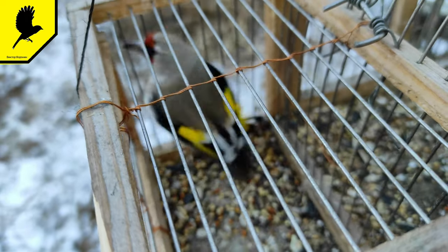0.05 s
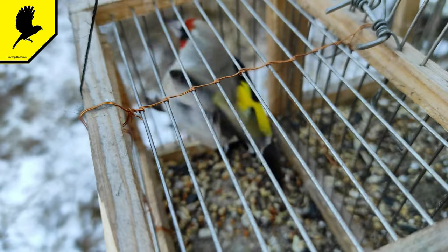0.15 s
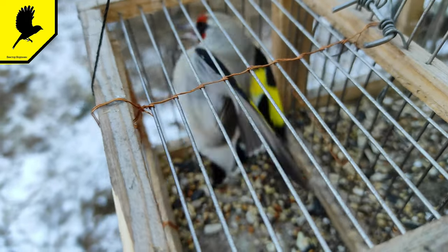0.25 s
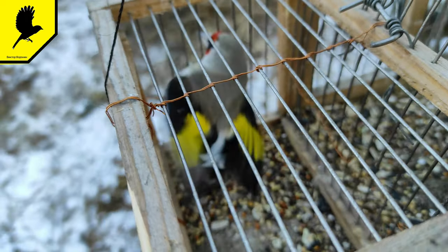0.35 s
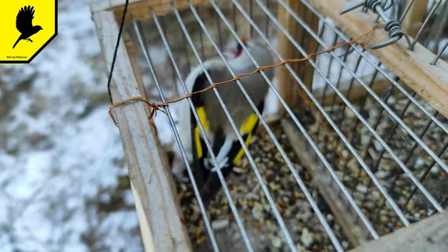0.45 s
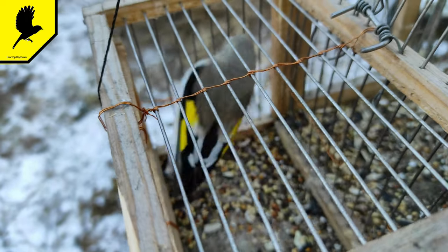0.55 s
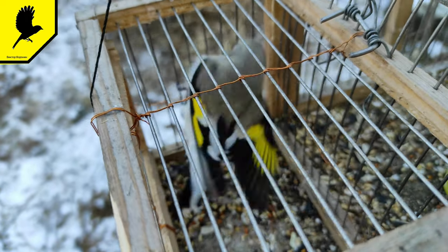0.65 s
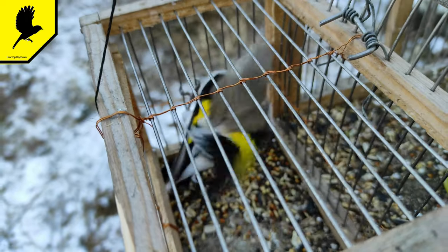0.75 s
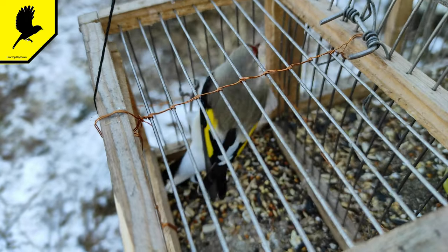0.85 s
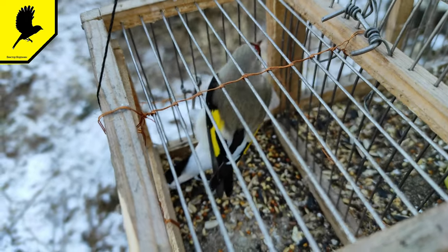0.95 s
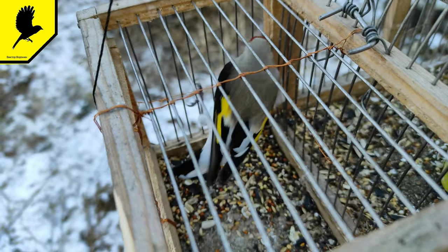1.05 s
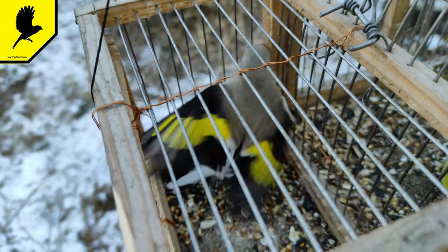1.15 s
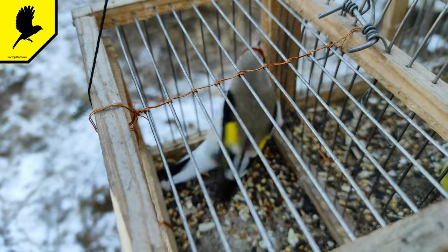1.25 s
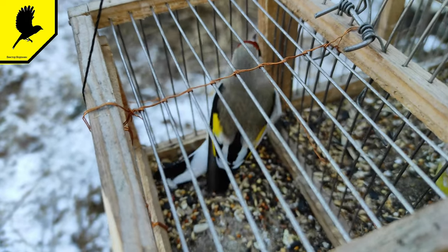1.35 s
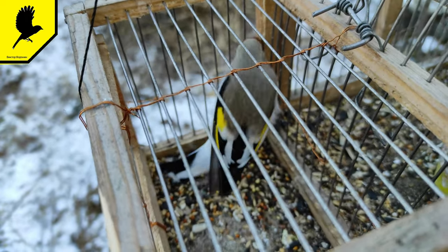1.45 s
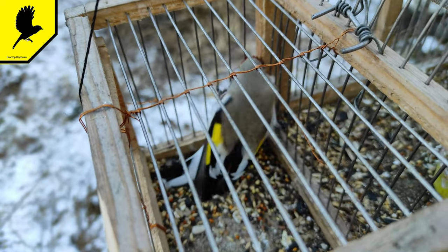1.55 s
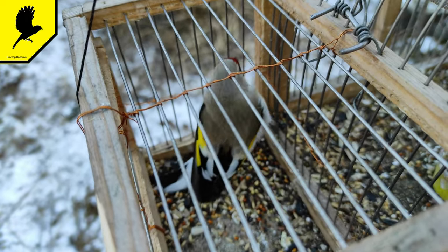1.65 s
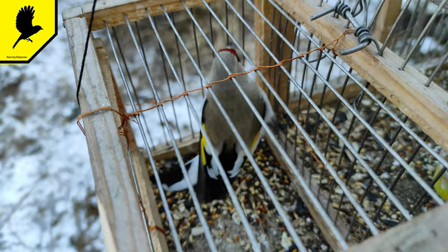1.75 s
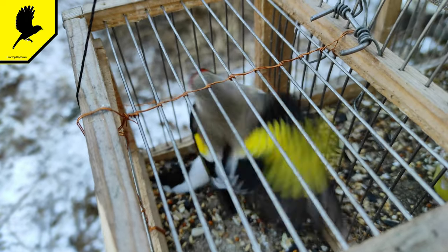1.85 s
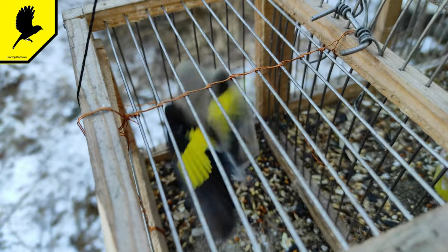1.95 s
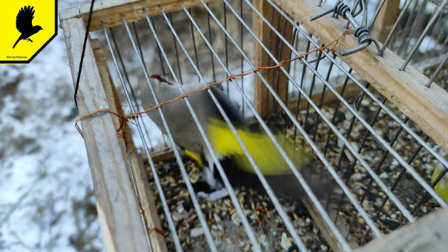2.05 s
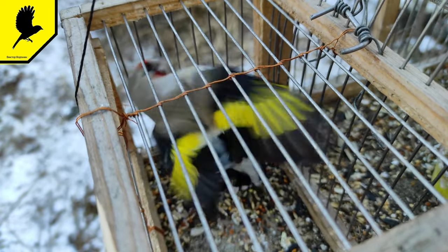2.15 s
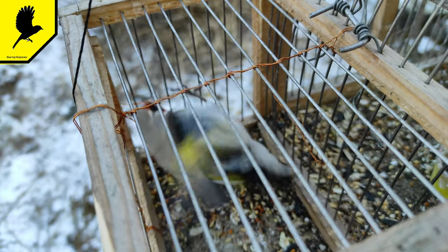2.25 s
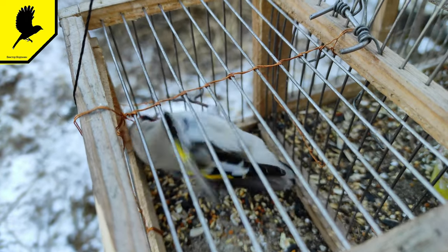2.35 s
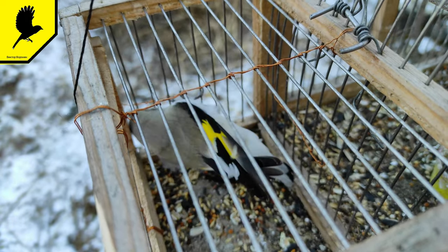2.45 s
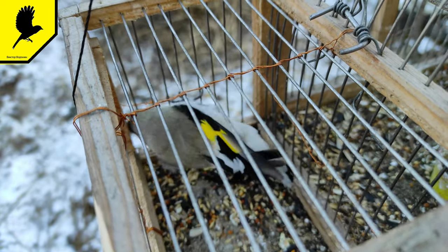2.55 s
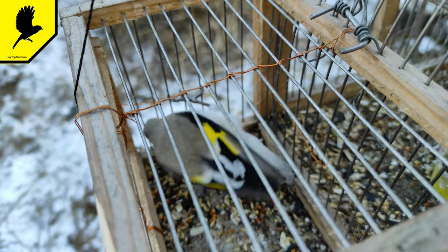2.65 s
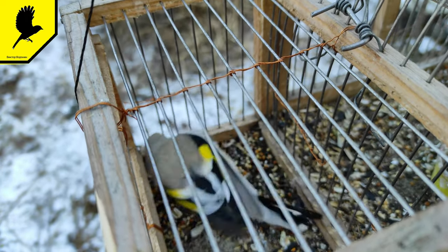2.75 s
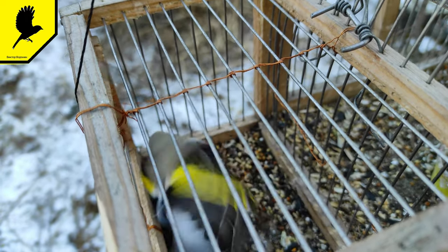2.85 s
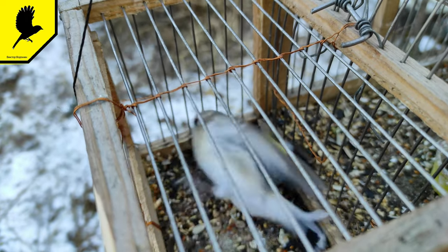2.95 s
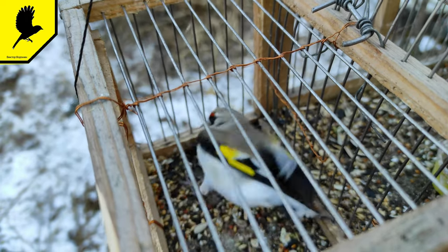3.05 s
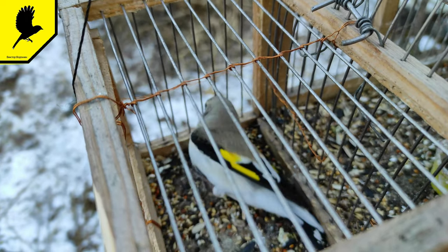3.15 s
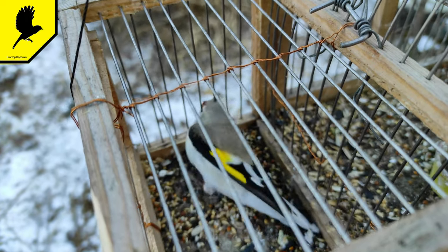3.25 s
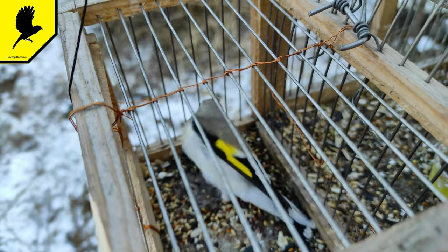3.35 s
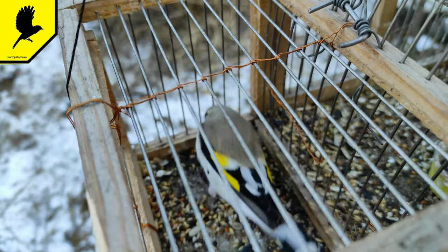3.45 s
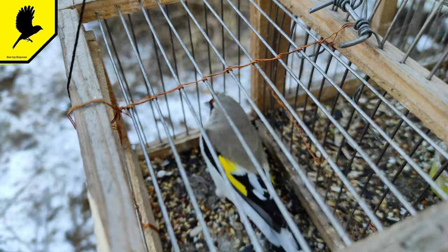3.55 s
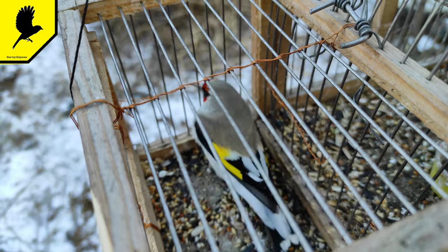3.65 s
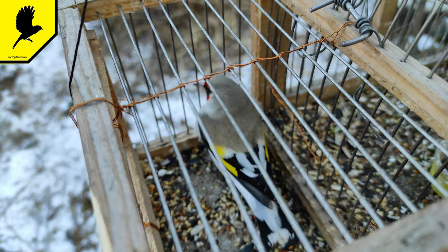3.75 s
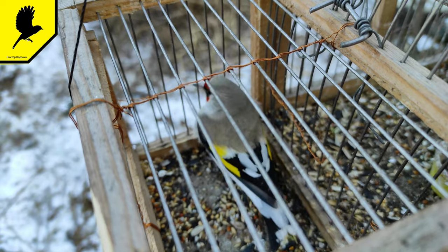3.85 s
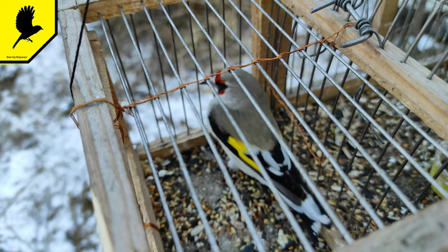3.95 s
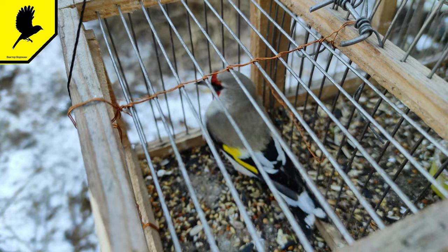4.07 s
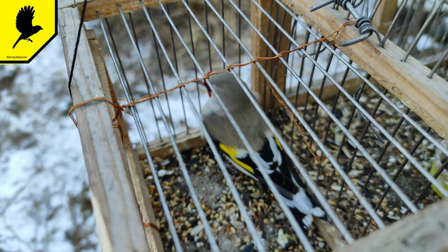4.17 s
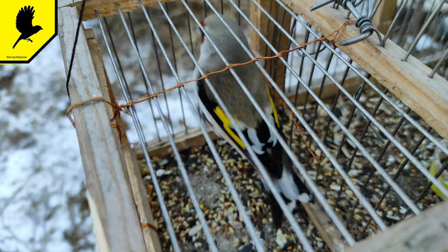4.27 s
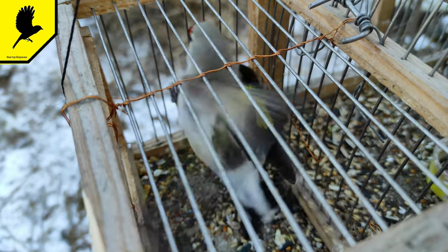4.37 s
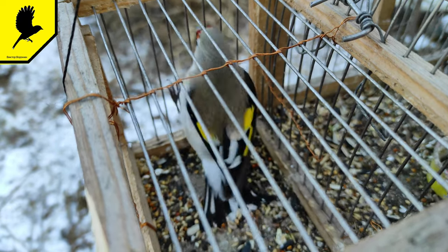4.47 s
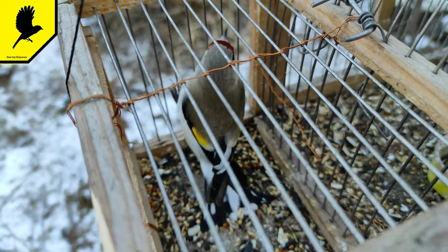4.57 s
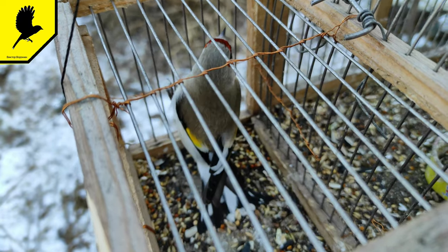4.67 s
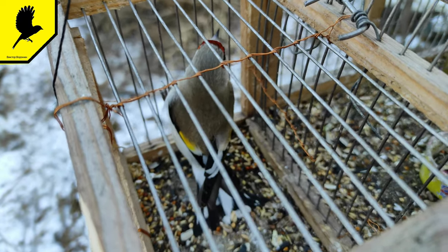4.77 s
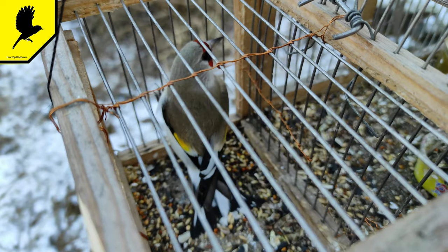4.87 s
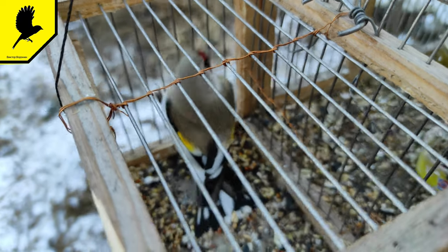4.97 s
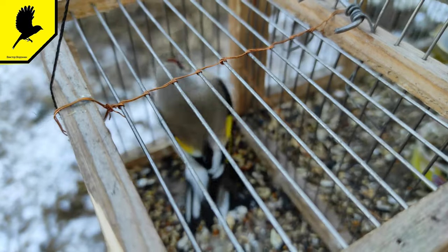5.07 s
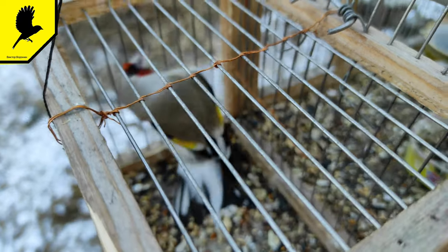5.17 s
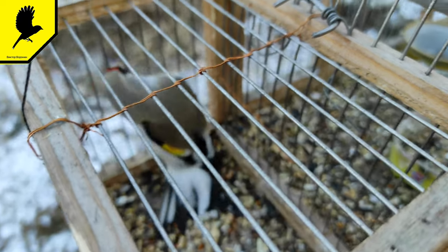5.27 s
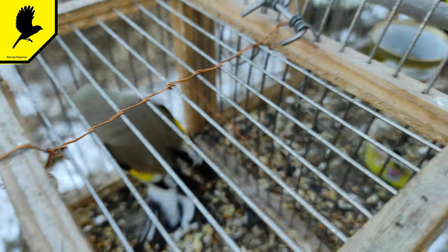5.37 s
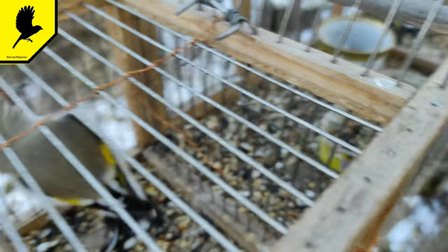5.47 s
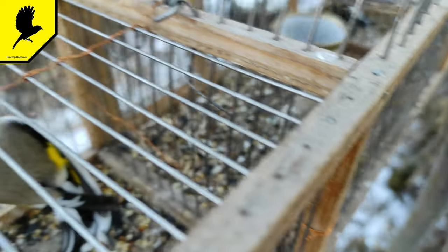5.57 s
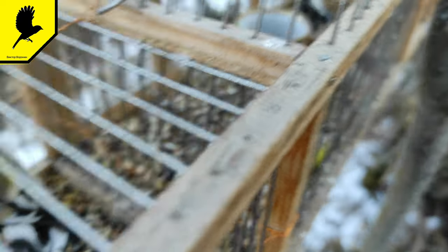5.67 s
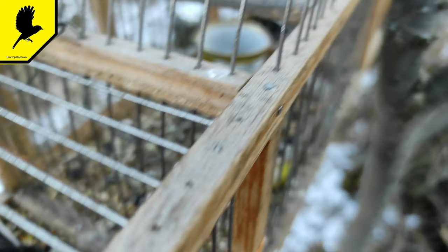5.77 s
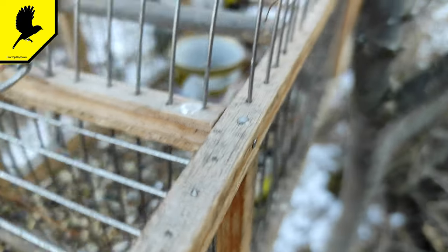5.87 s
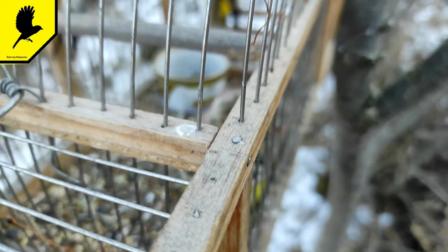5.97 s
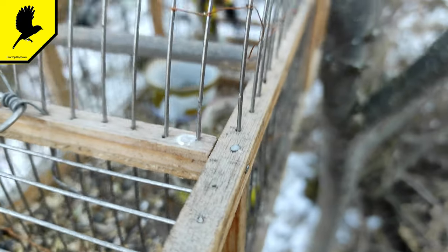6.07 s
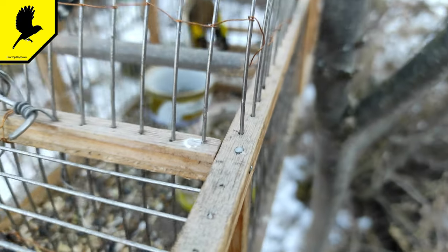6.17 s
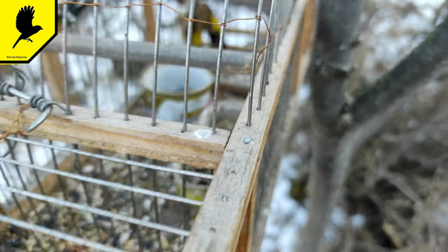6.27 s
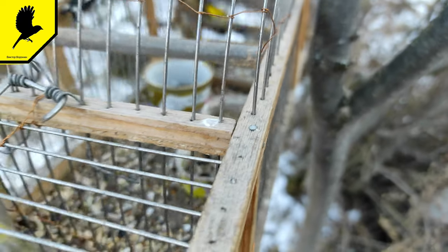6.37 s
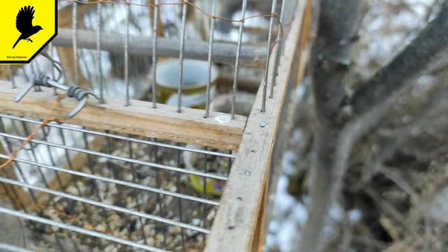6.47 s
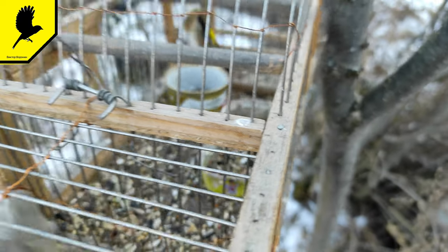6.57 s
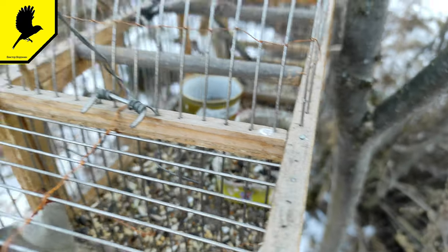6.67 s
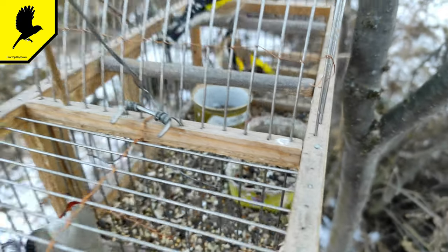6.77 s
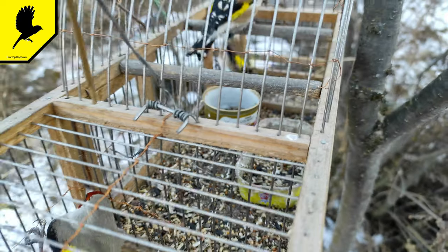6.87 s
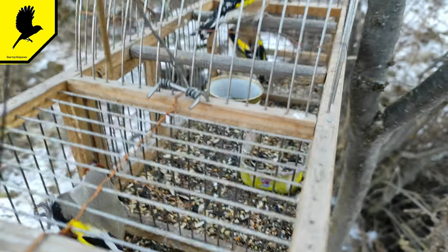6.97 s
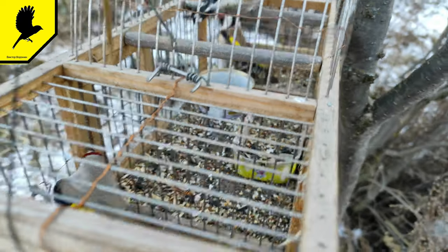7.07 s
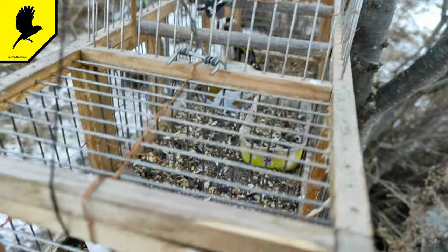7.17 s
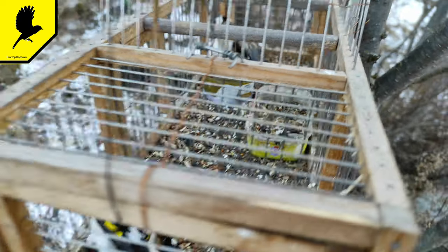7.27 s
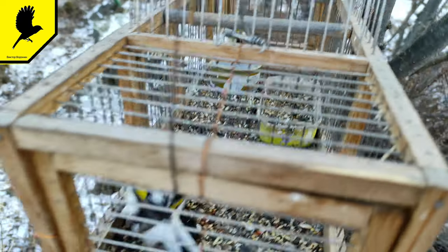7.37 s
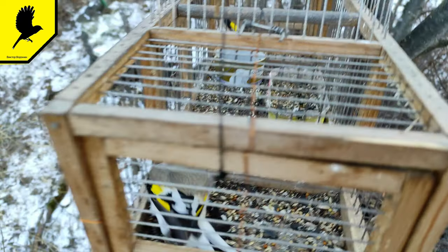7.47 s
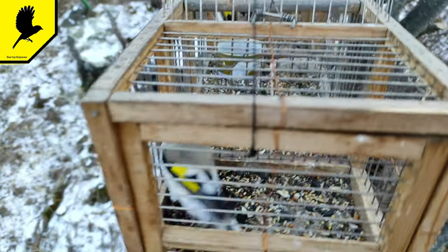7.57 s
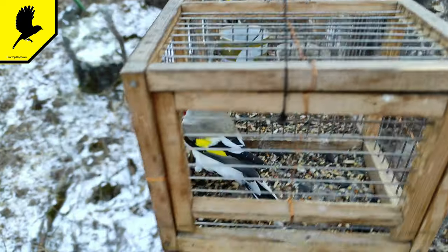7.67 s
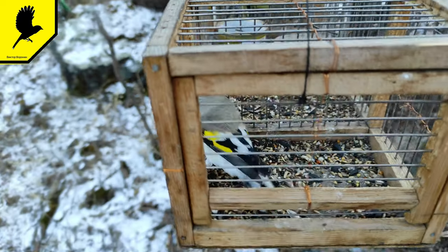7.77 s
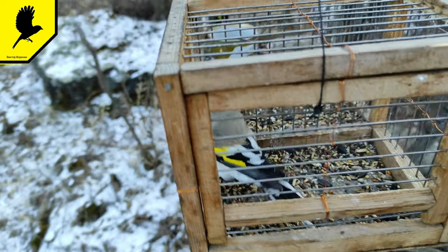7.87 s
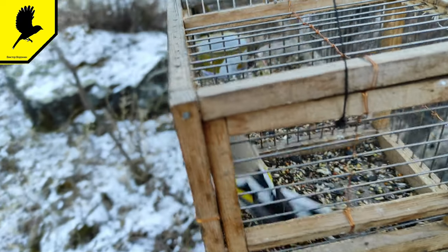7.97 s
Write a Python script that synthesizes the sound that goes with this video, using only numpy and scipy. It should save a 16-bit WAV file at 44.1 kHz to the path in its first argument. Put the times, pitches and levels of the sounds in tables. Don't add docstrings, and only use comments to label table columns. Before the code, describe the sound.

Close to a small wood-framed wire cage outdoors, a bird thrashes: feathers and claws rattle against the bars in bright, dry ticks, the frame knocks dully, and seeds rustle. A strong flurry opens, another comes around two to three seconds, then sparser hops and sharp knocks. Low wing draughts buffet the stereo microphone over faint airy hiss.

```python
import sys
import numpy as np
from scipy import signal
from scipy.fft import rfft, irfft
from scipy.io import wavfile
from scipy.ndimage import uniform_filter1d

SR = 44100
rng = np.random.default_rng(int(sys.argv[2]) if len(sys.argv) > 2 else 0)


def persist_wave(psi):
    counts = np.round(np.clip(psi, -1, 1) * 32767).astype(np.int16)
    wavfile.write(sys.argv[1], SR, np.atleast_2d(counts).T)


def boost(x):
    u = np.asarray(x, float) / 20
    return 10 ** u


N = 353549

# f/Hz, density/dB per Hz
AIR = [(59, -45.5), (165, 18), (811, 10), (3940, -18.5), (7020, -18), (16500, -31)]
# f/Hz, density/dB per Hz
DRAUGHT = [(12, -24.5), (20, 3), (91, -9), (245, -30), (300, -24), (390, -40), (660, -120)]
# t/s, level/dB
BREEZE = [(0, -51), (.9, -52), (1.2, -56), (1.65, -50.5), (2.0, -39.5), (2.3, -50.5), (3.2, -54),
          (3.8, -52), (4.1, -60), (4.5, -44.5), (4.75, -49.5), (5.05, -59.5), (5.45, -53.5), (6.0, -64.5),
          (8.02, -62.5)]
# t/s of peak, level/dB
GUSTS = [(.01, -40.5), (0.188, -41), (0.282, -51), (.42, -46), (.6, -41), (.75, -53), (1.328, -48),
         (2.22, -33.5), (2.66, -43.5), (2.95, -42), (1.85, -44), (3.82, -44.5), (4.42, -42), (6.17, -48),
         (7.97, -58), (5.188, -44.5), (5.48, -48), (5.722, -42.5), (6.062, -50)]
# t/s, rustle level/dB
UNREST = [(0, -50), (.8, -52.5), (.93, -55.5), (1.4, -57), (1.9, -56.5), (2.1, -43.5), (2.5, -54.5),
          (3.1, -43), (3.25, -54.5), (3.79, -60.5), (3.86, -70.5), (4.19, -71), (4.24, -46), (4.7, -63.5),
          (5.05, -61), (5.3, -54), (6.0, -56.5), (8.02, -51)]
# t/s of peak, level/dB, length/s
BRUSHES = [(0.068, -47.5, 0.07), (0.415, -40, 0.042), (0.716, -42.5, 0.042), (1.313, -44.5, 0.21),
           (2.332, -41.5, 0.041), (2.41, -36, 0.045), (2.944, -37.5, 0.14), (3.134, -58, 0.019),
           (4.045, -57, 0.081), (4.383, -45.5, 0.056), (4.271, -46, 0.045), (5.16, -54, 0.15),
           (2.604, -40.5, 0.14), (5.649, -46, 0.036), (5.813, -55, 0.042), (6.086, -45.5, 0.054),
           (6.55, -47, 0.28), (6.746, -56, 0.31), (7.34, -54, 0.2), (0.798, -42.5, 0.039),
           (2.189, -32, .008), (5.481, -37, 0.012), (1.36, -54, 0.0079), (.185, -43, .015),
           (5.6, -59, 0.041), (2.15, -39, 0.024), (2.677, -57, .06), (2.793, -48, 0.047),
           (6.62, -56, 0.025), (6.838, -59, 0.045), (7.564, -58, 0.041), (7.832, -48.5, 0.083)]
# f/Hz, density/dB per Hz
SCUFF = [(88, -40), (150, -3), (227, -3), (569, -10.5), (958, -1.5), (1160, -4), (1410, -9.5), (1550, -3.5),
         (4000, -7), (5200, -16.5), (8800, -120)]
# f/Hz, level/dB, t60/s
FRAME = [(596, -6.5, 0.043), (830.3, -1, 0.15), (950, 10.5, 0.049), (1146, 17.5, 0.018),
         (1380, 17.5, 0.015), (1717, 8, 0.029), (1970, 10, 0.024), (2480, -3, 0.075), (3280, -44, .03)]
# t/s of peak, level/dB
THUMPS = [(0.037, -31), (0.175, -24.5), (.26, -20.5), (0.434, -21.5), (.478, -23.5), (2.193, -48),
          (2.244, -28), (2.312, -46), (2.874, -22), (2.937, -22.5), (3.015, -27), (4.447, -23),
          (5.152, -34), (5.478, -29.5), (6.062, -28), (6.964, -30), (7.138, -27.5), (7.627, -32)]
# t/s of peak, level/dB, f/Hz that rings most
KNOCKS = [(0.172, -31, 1840), (0.185, -27.5, 1380), (0.2585, -30, 1780), (0.3074, -30.5, 600),
          (0.3392, -34, 1800), (0.424, -25.5, 1160), (0.4735, -22.5, 1530), (.7252, -39.5, 1660),
          (1.3901, -26, 2340), (1.4217, -23.5, 2110), (1.464, -24, 2130), (1.94, -30, 875),
          (2.0031, -25.5, 1380), (2.0511, -21, 950), (2.0881, -26.5, 1380), (2.195, -23, 1380),
          (2.7815, -27, 1480), (3.0858, -33, 1810), (4.0543, -40, 1530), (4.446, -22, 1110),
          (5.2488, -33, 2070), (5.4752, -26, 1030), (5.5232, -26.5, 1730), (6.1245, -31, 2070),
          (6.471, -25, 1130), (6.5309, -25.5, 950), (6.7179, -31.5, 950)]
# t/s of peak, level/dB, f/Hz that rings most
SHOVES = [(0.029, -29, 950), (0.595, -33.5, 2170), (0.825, -23, 1180), (1.0346, -39.5, 2170),
          (1.2282, -29.5, 1410), (1.339, -27.5, 937), (1.4477, -26.5, 950), (2.2346, -25.5, 1100),
          (2.3131, -27, 1010), (2.621, -30, 1620), (2.866, -26, 780), (2.936, -28, 704),
          (3.0548, -28, 2070), (3.1492, -36, 2010), (3.5238, -34, 1230), (3.5761, -36, 1550),
          (5.1302, -34, 1100), (5.4674, -36, 1230), (5.584, -24.5, 970), (5.748, -37, 2000),
          (5.8238, -37, 810), (6.056, -52, 1570), (6.5697, -29.5, 1070)]
# f/Hz, density/dB per Hz
TICK = [(880, -19.5), (1500, -11.5), (2010, -11), (2560, -18), (4470, -15), (5510, -6.5), (7010, 5),
        (7820, 1.5), (10200, -23), (11000, -36.5), (14300, -58), (22000, -120)]
# f/Hz, density/dB per Hz
TICK_TOP = [(5880, -19), (10000, -3), (12600, -1.5), (14400, -9), (15200, -2.5), (16200, -16.5)]
# t/s of onset, peak level/dB,
# decay/ms
SNAPS = [(0.073, -23, 4), (0.2905, -23, 4), (0.4004, -19, 3.3), (0.4209, -12.5, 4),
         (0.4607, -20.5, 6.8), (0.6821, -20, 4.4), (0.7057, -34, 4), (0.7127, -27, 4.3),
         (0.7442, -26, 4), (0.7791, -23.5, 4.4), (0.8015, -26, 5.1), (0.8649, -28, 3.2),
         (0.8973, -33, 4), (1.0235, -31, 6.6), (1.061, -34, 4), (1.196, -29, 4), (1.2264, -16, 5.1),
         (1.2546, -25, 4), (1.29, -25, 4), (1.3362, -24, 4), (1.5387, -34, 4), (1.5752, -27, 3.3),
         (1.6317, -27, 2.8), (1.7489, -56, 3), (1.8163, -33, 4), (2.0258, -22, 6.2), (2.0797, -16, 4),
         (2.0878, -19.5, 4.3), (2.269, -28, 3.7), (2.289, -19.5, 4), (2.3514, -19, 5.3),
         (2.4101, -16, 4.6), (2.4543, -21.5, 4.4), (2.484, -33.5, 4.2), (2.497, -25, 5),
         (2.5646, -19, 5.2), (2.617, -19, 3.3), (2.644, -27, 4), (2.669, -26, 4), (2.7482, -42, 4.4),
         (2.7615, -16.5, 4.4), (2.781, -24, 4), (2.817, -17.5, 4), (2.8742, -18, 4),
         (2.932, -17, 4.9), (2.949, -15, 4), (3.0002, -17, 5), (3.108, -28, 4), (3.126, -27, 4),
         (3.1753, -26, 4.8), (3.2558, -26, 2.5),
         (3.3423, -52, 3.3), (3.4296, -45, 4), (3.915, -47, 3.2), (4.0073, -38, 3.5),
              (4.0287, -33, 5.1), (4.2345, -29, 4.4), (4.259, -23.5, 3.4), (4.291, -26, 3.2),
              (4.33, -32, 3.6), (4.373, -21, 3.7), (4.6543, -31.5, 5.5), (4.9687, -39, 3.4),
              (5.1684, -36, 4.6), (5.1958, -28, 4.4), (5.347, -29, 4.8), (5.3823, -28.5, 6.9),
              (5.6281, -31, 4), (5.65, -27.5, 4), (5.6935, -27.5, 7.2), (5.7394, -24.5, 3.7),
              (5.765, -28, 4.7), (5.8217, -23, 4), (5.905, -29.5, 4), (5.9848, -49, 4), (6.0018, -40, 5.9),
              (6.226, -31, 2.5), (6.334, -38, 4), (6.351, -29, 4), (6.47, -20, 4), (6.5645, -18.5, 6.2),
              (6.621, -38, 4), (6.6432, -29, 4.5), (6.665, -26, 4.7), (6.6795, -22.5, 5.2),
              (6.7163, -30, 4), (6.8287, -25.5, 5.4), (6.8435, -24, 5.1), (6.9358, -26, 4.6),
              (6.9491, -25.5, 4.8), (7.0564, -47, 3), (7.1097, -30, 4.5), (7.1279, -23.5, 4),
              (7.264, -28, 4.4), (7.2769, -27, 4), (7.3143, -35, 4), (7.3447, -31, 4.9), (7.4903, -33, 3.6),
              (7.537, -29, 3.6), (7.56, -27, 5.3), (7.5832, -35, 3.6), (7.6594, -28, 4), (7.706, -25.5, 4),
              (7.7994, -32, 4), (7.8303, -29, 4), (7.873, -29, 4.6)]
# t/s of peak, level/dB, length/ms, left-right/dB
WING_TICKS = [(.1712, -14.5, 4.2, -16), (.1839, -12.5, 3.9, -12), (.2253, -16, 2.1, -1),
              (.2605, -10, 1.33, 18), (.3076, -22, 2, 2), (.4328, -14.5, 4, -9), (.5366, -28, 2, -6),
              (.545, -18, 2.5, -4), (.5937, -20, 8.6, 3), (.6363, -15.5, 2, 2.5), (.679, -19.5, 2.7, -13),
              (.7236, -21.5, 4.7, -6), (.8242, -15.5, 3.5, -6), (.836, -12, 3.2, 9), (.883, -24, 4.9, -1),
              (1.2286, -27, 5.9, -21), (1.881, -26, 1.6, 4), (1.9304, -13, 2.7, -17), (1.9411, -13, 3.6, 3),
              (1.993, -11.5, 3, -18), (2.0412, -15.5, 4.2, -12), (2.0512, -15, 5.1, -11.5),
              (2.0952, -20, 1.9, -12), (2.13, -17, 2.4, -9), (2.2335, -12, 3.7, -12), (2.306, -19, 7.8, -1),
              (2.3257, -13.5, 20, -6), (2.3405, -10.5, 5.3, 1), (2.372, -12, 7.3, 16),
              (2.4178, -7.5, 3.3, 3)]
# t/s of peak, level/dB, length/ms, left-right/dB
HOP_TICKS = [(2.77, -18, 6.7, 4), (2.8936, -19, 7.3, -17), (3.0553, -14, 4.7, -2), (3.1413, -20, 12.2, -11),
             (3.553, -25.5, 12, -4), (4.1127, -32.5, 0.86, -5), (4.2623, -23, 16, 2),
             (4.3958, -16.5, 6.1, -27), (4.4459, -9.5, 3.94, -17), (5.126, -18.5, 2.4, -4),
             (5.2233, -20.5, 3.8, 1), (5.2546, -21, 4.6, 4), (5.4654, -11.5, 1.43, -27),
             (5.4728, -4, 1.9, -13), (5.5064, -17, 3.1, -11), (5.552, -20.5, 6.8, -3),
             (5.8051, -23, 6.7, -24), (6.0347, -22, 5.8, -15), (6.0545, -13.5, 8.5, -27),
             (6.1198, -12.5, 4.2, -8), (6.3099, -27.5, 4.1, -12), (6.386, -25.5, 9, -9),
             (6.4439, -17, 3, 1.5), (6.5662, -14.5, 1.4, -10), (5.861, -24, 2, -19), (6.7238, -19, 3, -11),
             (7.234, -28.5, 2.7, -15), (7.289, -21, 10.2, -9.5), (7.43, -23, 3.1, -6)]
# t/s of peak, level/dB, length/ms, left-right/dB
BLUNT_TICKS = [(.2548, -5.5, 0.855, -10), (1.0374, -23, 4, -2), (1.1519, -14.5, 3.6, 1),
               (1.3716, -21, 2.8, 4.5), (1.3884, -21, 2.7, 12), (1.4068, -11, 4.7, -3),
               (1.4195, -11.5, 0.76, 4), (1.4455, -11, 3.5, 5), (1.4626, -10, 1.24, 9),
               (1.5704, -24.5, 17.6, 4), (1.651, -28, 5.9, -1.5), (1.7638, -29, 3.3, 5),
               (2.1456, -17, 1.4, -16), (2.1949, -9.5, 2.6, -12), (2.4034, -12, 4.9, -12),
               (2.6321, -8, 1.7, 21), (2.847, -13, 2.14, -13), (2.9515, -19, 9.9, -9),
               (3.525, -25, 2.5, -20), (3.812, -26, 6.6, 14), (3.8762, -34, 3.2, 6), (3.9785, -27, 2.5, 2),
               (4.2136, -27.5, 4.2, -2), (5.037, -31.5, 9.3, 2), (5.5826, -19.5, 7.4, 0),
               (6.167, -24, 3.6, -22), (6.19, -20.5, 2.6, -16), (6.5798, -20.5, 4.8, -9),
               (7.4922, -33, 1.9, -12)]
# t/s of peak, level/dB, length/ms, left-right/dB
SEED_TICKS = [(.0176, -10, 3.34, -12), (.3372, -20, 5.3, 22), (.3921, -19, 3.9, -7), (.4742, -10, 2.9, -18),
              (1.302, -19, 2.1, -5.5), (2.0022, -15.5, 3.4, 0), (2.5751, -16.5, 14.5, 25),
              (2.7218, -20.5, 11, 19), (2.8626, -14, 2.5, -5), (3.1986, -21.5, 4.4, 21),
              (3.627, -32.5, 1, 3), (5.2486, -15, 1.65, -5.5), (5.5211, -16, 3.7, -10),
              (6.4667, -32, 9.4, -8), (6.5279, -19, 3.3, 0), (6.88, -25.5, 4.3, 9),
              (6.962, -23.5, 10.3, -4), (7.1388, -26.5, 11, 6), (7.1572, -17, 3.1, 10),
              (7.623, -20, 4.4, 5)]

LEFT_LAG_S, LAG_SPREAD_S = .00022, .00016
BURST = 4096
TURN_S = 5.8
KNOCK_MS, SHOVE_MS, THUMP_MS, GUST_S = 3.8, 9.5, 11.5, .037
AIR_DB, OPEN_DB = -60, -2
TWIG_DB, CRISPER_DB = -58, 5.5
SCUFF_DB, SCUFF_FOLLOWS, REST_DB = -50.5, 0.92, -49


def rms_one(x):
    return x / np.sqrt(np.mean(x ** 2) + 1e-20)


def evened(x):
    return x / np.sqrt(np.mean(x ** 2, axis=1, keepdims=True) + 1e-20)


def leaning(db):
    return boost(np.array([[db], [-db]]))


def coloured(x, spectrum):
    hz, db = np.transpose(spectrum)
    grid = np.arange(1, 2050) * SR / 4096
    cepstrum = irfft(np.log(boost(np.interp(np.log(grid), np.log(hz), db))))
    cepstrum[1:2048] *= 2
    cepstrum[2049:] = 0
    response = irfft(np.exp(rfft(cepstrum)))[None, :2048]
    return signal.oaconvolve(x, response, axes=1)[:, :x.shape[1]]


def drift(rate, channels=1):
    r = np.exp(-2 * np.pi * rate / SR)
    slow = signal.lfilter([1], [1, -2 * r, r * r], rng.standard_normal((channels, N + SR)))
    return rms_one(slow[:, SR:])


def contacts(length, per_s, spread_db, alike):
    draws = rng.random((5, length))
    at = np.flatnonzero(draws[0] < per_s / SR)
    size = boost(-spread_db * np.log(draws[1, at] + .003)) * np.sign(draws[2, at] - .5)
    lag = (LEFT_LAG_S + LAG_SPREAD_S * 3.4 * (draws[3, at] - .5)) * SR
    left_share = alike + (1 - alike) * 10.2 * (draws[4, at] - .5)
    left_at = np.clip(at + np.round(lag).astype(int), 0, length - 1)
    out = np.zeros((2, length))
    out[1, at] = size
    np.add.at(out[0], left_at, size * left_share)
    return out


def ring(push, hz, t60):
    r, w = boost(-60 / (t60 * SR)), 2 * np.pi * hz / SR
    return signal.lfilter([0, np.sin(w)], [1, -2 * r * np.cos(w), r * r], push + 1e-18)


def frame(push, strengths_db):
    out = 0
    for (hz, level_db, t60), own_db in zip(FRAME, strengths_db):
        out = out + boost(level_db + own_db) * ring(push, hz, t60)
    return out


def patchy(x, low_hz, patch_db, rate):
    edges = low_hz * 2 ** np.arange(0, 3.6, .5)
    out = 0
    for low, high in zip(edges, edges[1:]):
        b, a = signal.butter(1, [low, high], "band", fs=SR)
        out = out + signal.lfilter(b, a, x) * boost(patch_db * drift(rate))
    return out


def effort_db(curve, swells):
    t = np.arange(0, N + 64, 64) / SR
    power = boost(np.interp(t, *np.transpose(curve))) ** 2
    for s, level_db, length_s in swells:
        power = power + boost(level_db) ** 2 * np.exp(-(2 * (t - s) / length_s) ** 2)
    return np.interp(np.arange(N) / SR, t, 10 * np.log10(power))


def swell(length_ms, tail_db):
    t = np.arange(BURST) / SR / (length_ms / 2600)
    return (t / 2) ** 3.0 * np.exp(2 - 1.4 * t) + boost(tail_db) * (1 - np.exp(-t)) * np.exp(-t / 7)


def add(out, sound, s, level_db, smooth_ms):
    power = uniform_filter1d(np.mean(sound ** 2, axis=0), round(smooth_ms * SR / 1000))
    i = max(round(s * SR) - np.argmax(power), 0)
    out[:, i:i + BURST] += boost(level_db) / np.sqrt(power.max()) * sound


def facing_out():
    return .5 + .5 * np.tanh(2 * (np.arange(N) / SR - TURN_S))


def open_air():
    noise = rng.standard_normal((3, N))
    twig_band = signal.butter(2, [2200, 6000], "band", fs=SR, output="sos")
    twigs = rms_one(signal.sosfilt(twig_band, noise[1:]))
    hiss = rms_one(coloured(noise[:2] + 1.55 * noise[2], AIR))
    out = facing_out()
    return boost(TWIG_DB) * out * twigs + boost(AIR_DB + OPEN_DB * out) * hiss


def draught():
    level_db = effort_db(BREEZE, [(*row, GUST_S) for row in GUSTS])
    air = rng.standard_normal((3, N))
    lumps = boost(2.85 * drift(39, channels=2) + 4.6 * drift(6.4))
    rumble = rms_one(coloured(air[:2] + .5 * air[2], DRAUGHT) * lumps)
    return leaning(1.6) * boost(level_db + 3.5) * rumble


def scuff(grains, clumps, rustle_db):
    level_db = SCUFF_DB + SCUFF_FOLLOWS * (rustle_db - REST_DB)
    grains = 0.7 * grains + contacts(N, per_s=7000, spread_db=1.5, alike=0.64)
    body = rms_one(coloured(patchy(grains, 198.4, patch_db=6.0, rate=19.7), SCUFF))
    wood = rms_one(frame(grains, np.zeros(len(FRAME))))
    sound = rms_one((body + .5 * wood) * boost(2.0 * clumps + 0.21 * drift(17.0)))
    return leaning(1.6) * boost(level_db + 3.5) * sound


def rustle(grains, clumps, rustle_db):
    crisp_db = -20.5 + CRISPER_DB * facing_out() + 2.0 * drift(2.2)
    crisp = rms_one(coloured(grains, TICK_TOP)) * boost(crisp_db)
    body = rms_one(coloured(patchy(grains, 1420, patch_db=4.5, rate=11.8), TICK))
    sound = rms_one((body + crisp) * boost(1.2 * clumps + 1.6 * drift(66)))
    return boost(rustle_db + 4.5) * sound


def stirring():
    rustle_db = effort_db(UNREST, BRUSHES)
    clumps = drift(20.5) * (1 - facing_out())
    grains = contacts(N, per_s=9000 * boost(2.1 * drift(60)[0]), spread_db=3.5, alike=0.99)
    return rustle(grains, clumps, rustle_db) + scuff(grains, clumps, rustle_db)


def thumps():
    out = np.zeros((2, N + BURST))
    lows = signal.butter(2, [45, 520], "band", fs=SR, output="sos")
    for s, level_db in THUMPS:
        puff = rng.standard_normal((3, BURST)) * swell(THUMP_MS, tail_db=-6.5)
        sound = signal.sosfilt(lows, puff[0] + 0.67 * puff[1:])
        add(out, leaning(1.7) * sound, s, level_db - 14.0, smooth_ms=8)
    return out[:, :N]


def knocks():
    out = np.zeros((2, N + BURST))
    hits = [(*row, KNOCK_MS) for row in KNOCKS] + [(*row, SHOVE_MS) for row in SHOVES]
    for s, level_db, knock_hz, ms in hits:
        burst = contacts(BURST, per_s=2500, spread_db=4.0, alike=.8) * swell(ms, tail_db=-5.0)
        octaves_off = np.abs(np.log2(np.array(FRAME)[:, 0] / knock_hz))
        near_db = -18.0 * octaves_off + rng.normal(0, 6.2, len(FRAME))
        sound = rms_one(frame(burst, near_db)) + 0.51 * rms_one(coloured(burst, SCUFF))
        add(out, leaning(1.7) * sound, s, level_db - 4.0, smooth_ms=3)
    return out[:, :N]


def snaps():
    out, t = np.zeros((2, N + BURST)), np.arange(BURST) / SR
    for s, level_db, ms in SNAPS:
        burst = contacts(BURST, per_s=7700, spread_db=2.0, alike=0.88) * np.exp(-t / (ms / 1000))
        wire = ring(burst, 1500 * 4 ** rng.random(), t60=.004)
        body = evened(coloured(burst + 0.15 * wire, TICK))
        crisp = boost(-20.5) * evened(coloured(burst, TICK_TOP))
        wood = boost(-14.5 + rng.normal(0, 8.5)) * evened(coloured(burst, SCUFF))
        sound = body + crisp + wood
        i = round(s * SR)
        out[:, i:i + BURST] += boost(level_db - 5.0) * sound / np.abs(sound.mean(axis=0)).max()
    return out[:, :N]


def ticks(rows, top_db):
    out = np.zeros((2, N + BURST))
    for s, level_db, ms, pan_db in rows:
        burst = contacts(BURST, per_s=8600, spread_db=3.5, alike=0.51) * swell(ms, tail_db=-11.0)
        peak = round(ms * SR / 1200)
        burst[[0, 1], [peak + round(LEFT_LAG_S * SR), peak]] += 22 / ms
        wire = ring(burst, 2300 * 3.6 ** rng.random(), t60=.0025)
        body = evened(coloured(burst + 0.27 * wire, TICK))
        crisp = boost(top_db) * evened(coloured(burst, TICK_TOP))
        add(out, leaning(.2 * pan_db) * (body + crisp), s, level_db - 9.0, smooth_ms=2)
    return out[:, :N]


def strikes():
    wires = ticks(WING_TICKS, top_db=-20) + ticks(HOP_TICKS, top_db=-20.5)
    wires = wires + ticks(BLUNT_TICKS, top_db=-25.5) + ticks(SEED_TICKS, top_db=-10)
    return thumps() + knocks() + wires


def scene():
    return open_air() + draught() + stirring() + snaps() + strikes()


def band_limit(x):
    return signal.sosfilt(signal.butter(12, 16500, fs=SR, output="sos"), x)


def record(dry):
    rounded = .9 * np.tanh(dry / .9)
    top_cut = signal.cheby2(10, 50, 16600, fs=SR, output="sos")
    return band_limit(signal.sosfilt(top_cut, rounded))


dry = scene()
out = record(dry)
persist_wave(out)
```